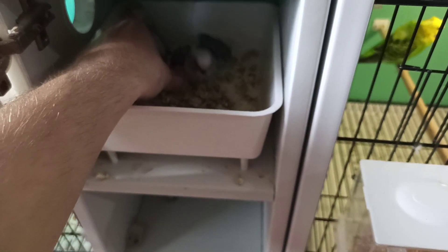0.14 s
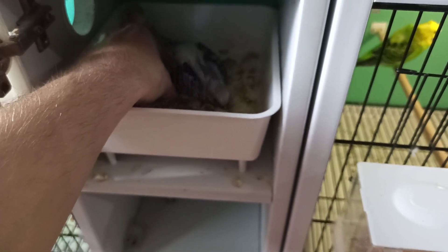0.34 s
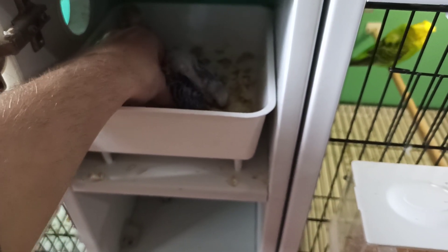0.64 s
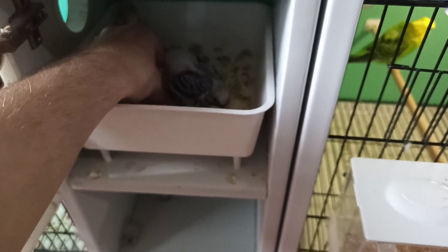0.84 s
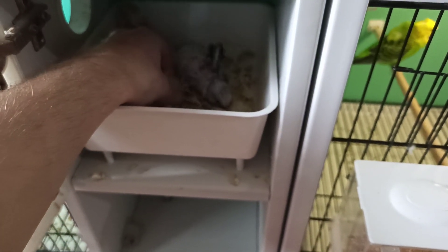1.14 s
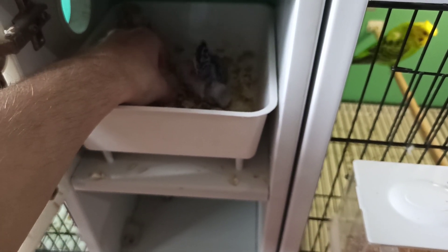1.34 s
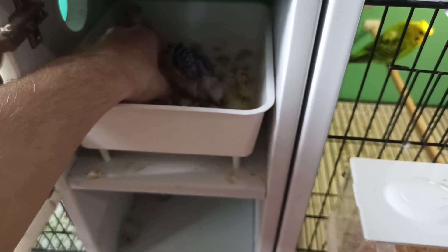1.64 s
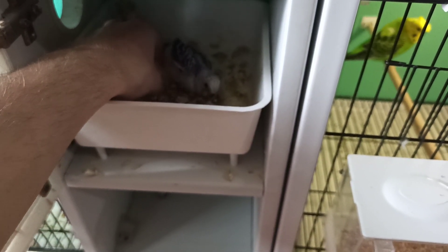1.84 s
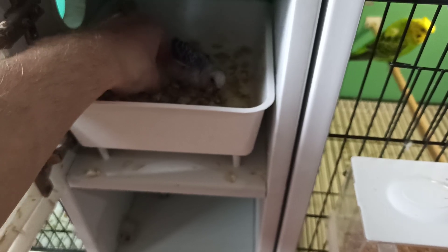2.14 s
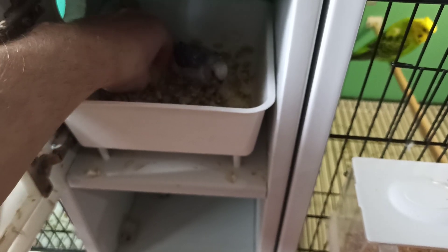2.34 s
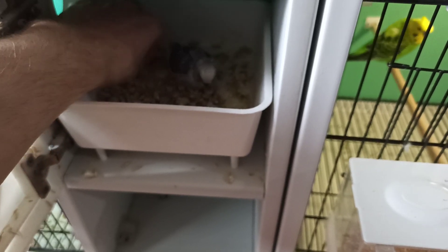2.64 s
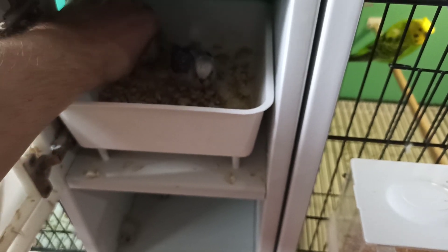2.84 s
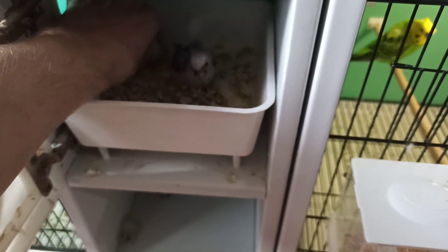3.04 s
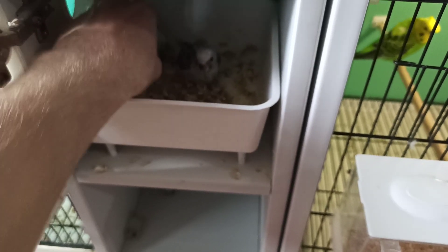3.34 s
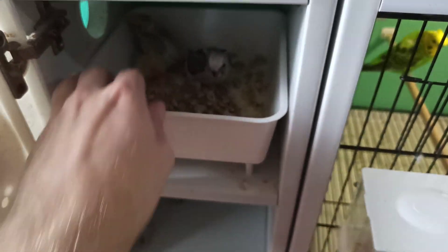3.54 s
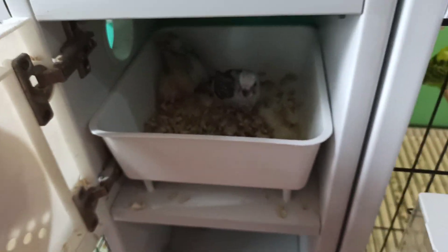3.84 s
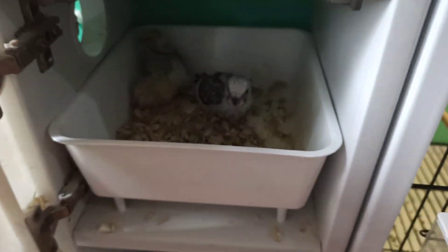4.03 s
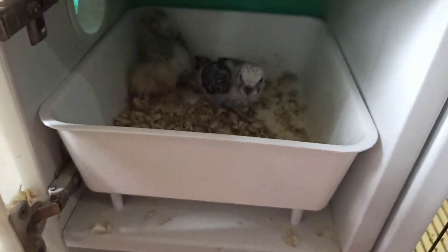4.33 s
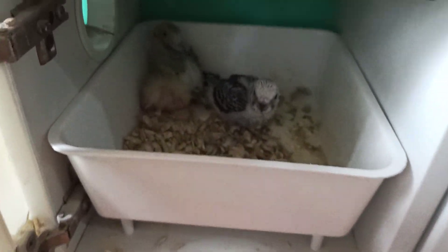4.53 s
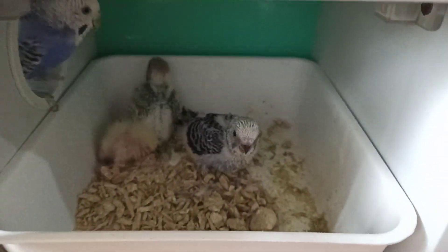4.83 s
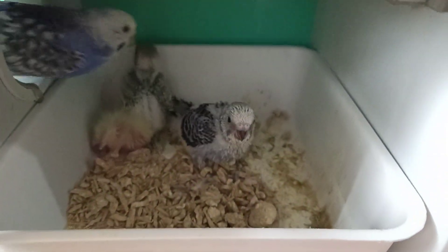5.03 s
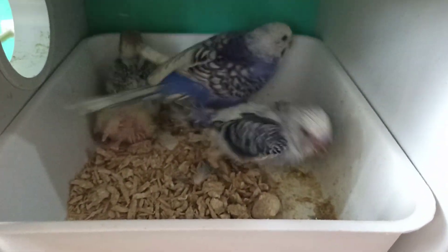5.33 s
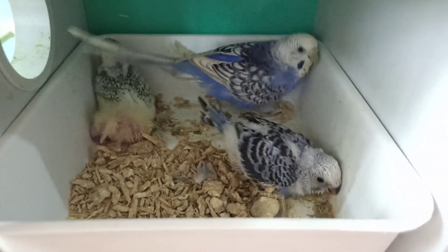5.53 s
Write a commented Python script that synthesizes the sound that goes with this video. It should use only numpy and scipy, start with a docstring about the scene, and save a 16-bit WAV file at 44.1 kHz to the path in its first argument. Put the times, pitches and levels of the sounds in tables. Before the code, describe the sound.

Budgerigar chicks peep and rustle in wood shavings while adult birds squawk and scold, until one lands in their plastic tub with soft thumps.

```python
"""Budgerigar chicks peep in a plastic nest tub while a hand shifts one of them on wood shavings.
About a second in, grown parrots whistle and squawk farther off in a hard-walled bird room; thin chips
come throughout. Each voice is a vibrating membrane, the syrinx, that rasps when it flutters unevenly.
After two seconds and again after four, a faint low tone comes and goes and parrots scold in puffs of air.
Near the end a parent drops into the tub with a few thumps. The room's air rushes softly under it all."""
import sys
import numpy as np
from scipy import signal
from scipy.fft import rfft, irfft, next_fast_len
from scipy.io import wavfile
from scipy.ndimage import uniform_filter1d

SR = 44100
rng = np.random.default_rng(int(sys.argv[2]) if len(sys.argv) > 2 else 0)


def wrap_up_sound(samples):
    """Save the sound to the file named by the first command line argument, as 16-bit audio."""
    columns = np.atleast_2d(samples).T
    # keep every value between -1 and 1, then stretch to whole-number steps
    tamed = np.clip(columns, -1, 1)
    steps = np.round(tamed * 32767).astype(np.int16)
    wavfile.write(sys.argv[1], SR, steps)


N = 250440
T = np.arange(N) / SR

# Runs of peeps, timed at their upward flicks. Each row: first and last flick in seconds,
# low and top pitch in Hz, first and last level in dB.
PEEP_TRAINS = [(.002, 0.063, 3294, 5026, -41.5, -37), (0.311, 0.43, 3265, 4554, -45.5, -40.5),
               (.578, .578, 3247, 4100, -38, -37), (.765, .883, 3255, 4600, -40, -39),
               (1.707, 1.818, 3274, 4905, -39, -42.5), (2.036, 2.156, 3223, 4710, -39, -38),
               (2.978, 3.03, 3140, 5140, -49, -43), (3.256, 3.379, 3295, 4813, -42.5, -40),
               (3.753, 3.82, 3160, 4750, -50, -42), (4.179, 4.228, 3240, 4823, -45.5, -43.5),
               (4.898, 5.073, 3075, 4240, -42.5, -41.5), (2.233, 2.316, 2276, 3714, -49, -56),
               (2.9, 2.957, 2410, 3900, -58.5, -52), (4.146, 4.352, 2332, 3800, -46.5, -52),
               (4.996, 5.069, 2287, 3400, -50, -50.5), (5.595, 5.656, 2974, 3996, -52, -48)]
# One peep. Each row: seconds from the flick, share of the way from low to top pitch, gain in dB.
PEEP_SHAPE = [(-.055, .08, -10), (-.047, 0, 5), (-.032, .1, 4), (-.013, .28, 5.5), (-.005, .45, 1),
              (-.001, .9, 11), (.003, .92, 11), (.009, .5, 5), (.014, .02, 4), (.024, -.15, -12)]
# How a chick's throat shapes its voice. Each row: frequency in Hz, gain in dB.
CHICK_THROAT = [(2200, 4), (3500, 2.5), (4500, -4), (5300, -1.5), (6300, -14), (7400, 2.5), (8500, -17),
                (11000, -40.5), (15000, -26)]
# How much of the overtones the chicks' beaks let out. Each row: time in seconds, gain in dB.
BEAK_OPENING = [(0, -1.5), (3.8, -2), (4.1, -18), (5.68, -10.5)]
# Long, arching parrot calls. Each row: start, lift, crest and end in seconds, low and crest pitch in Hz,
# start and crest level in dB, roughness from 0 to 1, strength of the octave at the low pitch in dB.
WHINES = [(0.561, 0.579, .6, .68, 1900, 2750, -37, -27, 0.5, 9.5),
          (0.984, 1.02, 1.065, 1.1, 1695, 1803, -15.5, -18, 0.3, 24.5),
          (1.05, 1.061, 1.14, 1.225, 1885, 2501, -27, -23, 0.32, -13),
          (2.27, 2.281, 2.33, 2.37, 1480, 1723, -53, -48, 0.15, 1),
          (3.31, 3.371, 3.405, 3.425, 2000, 2400, -45, -34, .6, -2),
          (3.53, 3.61, 3.688, 3.828, 1667, 2420, -32, -20, 0.15, 4)]
# Squawks. Each row: time the voice cracks in seconds, length of the held note in seconds, level in dB.
SQUAWKS = [(.80, .05, -15), (1.21, .08, -15)]
# One falling cry: start and end in seconds, start and end pitch in Hz, start and end level in dB,
# roughness from 0 to 1.
SWOOP = (2.34, 2.478, 3800, 2770, -38, -20, .3)
# How a grown parrot's throat shapes its upper overtones. Each row: frequency in Hz, gain in dB.
PARROT_THROAT = [(4500, -23), (6200, -32), (7400, -25), (8200, -28.5), (10000, -66), (13500, -31),
                 (16000, -32)]
# The swirling air in a screech. Each row: frequency in Hz, gain in dB.
SCREECH_AIR = [(1100, -44), (1900, 1), (3000, 11), (4400, 5.5), (5700, -15), (7400, 1), (13000, -11.5),
               (16000, -28)]
# Harsh scolding notes. Each row: loudest moment, rise and fall in seconds, relative level in dB,
# added brightness in dB per octave.
SCOLDS = [(2.545, .026, .028, -19, -2.5), (2.668, .016, .028, -20, 1), (4.465, .018, .025, -18.5, .3),
          (4.592, .024, .022, -17.5, .5), (4.741, .014, .014, -22.5, -.7), (5.306, .018, .02, -21, 0),
          (5.428, .027, .022, -19.5, .5)]
# The wide throat of a scolding bird. Each row: frequency in Hz, gain in dB.
SCOLD_THROAT = [(700, -33), (1300, -24), (2100, -14), (2700, -6), (3600, 1.5), (5000, -5), (6600, -3.5),
                (7800, -5.5), (12000, -13), (15500, -14)]
# Quick whistled slides. Each row: start and length in seconds, starting pitch in Hz, level in dB.
CHIPS = [(.527, .019, 7100, -47), (1.812, 0.023, 7130, -47), (3.153, 0.0095, 5180, -43.5),
         (3.526, 0.014, 5160, -29), (3.934, .015, 7100, -36.5), (3.974, 0.027, 6720, -41.5),
         (4.82, 0.022, 7260, -35), (5.234, 0.018, 7050, -41), (5.625, 0.019, 7100, -33.5)]
# Short pips on one note. Each row: start and length in seconds, pitch in Hz, level in dB.
PIPS = [(3.952, 0.011, 6430, -45.5), (4.421, 0.013, 6560, -38), (5.210, 0.0095, 6460, -32.5)]
# Blows on the tub. Each row: time in seconds, relative peak in dB, boost of the rim's ring in dB.
KNOCKS = [(.2, -35.5, -2), (.659, -31.5, -16), (2.649, -40.5, 13), (3.252, -39, -30), (3.484, -36, 9),
          (3.643, -35.5, 12), (4.137, -41, -1), (4.874, -38, 3), (5.293, -24.5, 12.5), (5.441, -23.5, -7),
          (5.558, -28.5, 25)]
# The parent's first footfall, laid out like one knock.
LANDING = (5.211, -20.5, -6)
# The tub's ringing notes. Each row: pitch in Hz, level in dB, seconds to fade by 60 dB.
TUB_RING = [(144.6, -13.5, 0.18), (266.7, 2, 0.087), (311.5, 6.5, 0.057), (361.5, -4, 0.069),
            (489, -4.5, 0.04), (643, 0, 0.03), (780, 4.5, 0.017), (890, 0, 0.029), (1140, 1.5, 0.027),
            (1342, -8, 0.047), (2020, -15, 0.06)]
# Spells of stirring in the bedding. Each row: start and end in seconds, level in dB.
RUSTLES = [(0, 0.177, -42), (0.553, 1.643, -42), (2.018, 2.873, -42), (3.36, 3.75, -42.5),
           (4.165, 4.284, -41), (4.6, 4.95, -44.5), (5.15, 5.68, -37)]
# The sharpest snaps of shavings and claws. Each row: time in seconds, relative peak in dB.
SNAPS = [(.5227, -39), (1.9264, -48), (2.393, -36), (2.8523, -42), (3.16, -43.5), (4.1742, -38),
         (4.2253, -34), (4.2752, -33.5), (4.8739, -32), (5.145, -35), (5.1929, -35.5)]
# The tone colour of wood shavings. Each row: frequency in Hz, gain in dB.
SHAVINGS = [(200, -2.5), (600, 1), (1100, -7.5), (1700, -0.5), (3500, 0), (4600, -2), (5500, -15.5),
            (7300, -5.5), (12000, -15.5), (16000, -3)]
# The faint low tone. Each row: start and length in seconds, level in dB.
LOW_TONES = [(2.18, .1, -46), (2.32, .12, -46), (2.49, .1, -47), (4.17, .1, -50), (4.48, .1, -50),
             (4.61, .11, -49)]
# The tone colour of the room's rushing air. Each row: frequency in Hz, gain in dB.
AIR_COLOUR = [(25, -44.5), (45, -57), (70, -8.5), (97, 6), (190, -1), (300, 4), (500, -3.5), (700, -12),
              (950, -6), (1500, -22.5), (4000, -26)]
# How that rush swells and sinks. Each row: time in seconds, relative level in dB.
AIR_LEVEL = [(0, -52), (2.1, -54), (2.7, -49.5), (3.0, -50), (3.9, -52), (4.4, -50), (5.68, -50)]
# How alike the rush is in both ears. Each row: frequency in Hz, likeness from 0 to 1.
EAR_LIKENESS = [(60, 0.96), (300, 0.91), (600, 0.88), (1200, 0.091), (3000, 0)]
# The room's echo. Each row: frequency in Hz, seconds to fade by 60 dB.
ROOM_ECHO = [(200, .4), (1000, .5), (2200, .55), (3200, .62), (7000, .58), (14000, .4)]
# The microphone's uneven treble. Each row: frequency in Hz, gain in dB.
MICROPHONE = [(4400, -1), (5400, -1), (6500, 8.5), (7700, 3), (8500, -3.5), (9300, -81.5), (10800, -62),
              (11800, -1), (16000, -10)]


def chicks(shimmer_db=2, beak_db=3, jitter=.02, buzz=.4, buzz_hz=750, stretch=.1):
    """A chick's syrinx makes each peep: the pitch sags, creeps up, flicks high and drops."""
    out = np.zeros(N)
    when, share, swell_db = np.transpose(PEEP_SHAPE)
    t = np.arange(when[0], when[-1], 1 / SR)
    for s, low_hz, top_hz, db in peeps():
        pace = 1 + stretch * rng.uniform(-1.065, 1)
        glide = uniform_filter1d(np.interp(t * pace, when, share), size=220)
        hz = (low_hz + (top_hz - low_hz) * glide) * (1 + jitter * wander(len(t), 600))
        level = amp(db + np.interp(t, when, swell_db) + shimmer_db * wander(len(t), 120))
        # the moving beak lets more or less of the overtones out
        opening_db = np.interp(s, *np.transpose(BEAK_OPENING)) + beak_db * np.tanh(wander(len(t), 23))
        voice = syrinx(hz, [read(CHICK_THROAT, k * hz) + (k > 1) * opening_db for k in range(1, 5)])
        # the other side of the syrinx beats against the first and roughens some peeps
        voice *= 1 + buzz * rng.random() * syrinx(buzz_hz * (1 + 0.148 * wander(len(t), 100)), [0])
        add(out, s + t[0], level * voice * signal.windows.tukey(len(t), .1))
    return out


def peeps(cycles_apart=185, last_flick=0.76, flick_spread=.08):
    """Spaces peeps evenly in each run; deeper chicks peep more slowly, and a run ends on a lower flick."""
    for first, last, low_hz, top_hz, first_db, last_db in PEEP_TRAINS:
        count = round((last - first) * low_hz / cycles_apart) + 1
        for progress in np.linspace(0, 1, count):
            flick = (last_flick if progress == 1 else 1) * (1 + flick_spread * rng.uniform(-0.97, 1))
            flick_hz = low_hz + (top_hz - low_hz) * flick
            db = first_db + progress * (last_db - first_db)
            yield first + progress * (last - first), low_hz, flick_hz, db


def parrots(rasp=0.1344, rasp_hz=700, flutter_db=7, flutter_hz=380, air=0.77):
    """Whistled calls that break into a screech when the membrane flutters wildly."""
    out = np.zeros(N)
    calls = [whine(*row) for row in WHINES] + [squawk(*row) for row in SQUAWKS] + [swoop(*SWOOP)]
    for s, hz, db, rough, octave_db in calls:
        size = len(hz)
        hz = hz * np.exp(rasp * rough * wander(size, rasp_hz))
        total_db = 10 * np.log10(1 + amp(octave_db) ** 2)  # the note and its octave share the power
        overtones_db = [read(PARROT_THROAT, k * hz) for k in range(3, 10)]
        tone = syrinx(hz, [-total_db, octave_db - total_db] + overtones_db)
        noisy = np.clip(air * (rough - .15), 0, 1)  # past this roughness the air starts to swirl
        screech = evened(colour(rng.standard_normal(size), SCREECH_AIR))
        voice = np.sqrt(1 - noisy) * tone + np.sqrt(noisy) * screech
        level = amp(db + flutter_db * rough * np.tanh(wander(size, flutter_hz)))
        add(out, s, voice * level * signal.windows.tukey(size, .12))
    return out


def whine(start, lift, crest, end, low_hz, crest_hz, start_db, crest_db, rough, octave_db):
    """The bird's effort lifts pitch and level together; past the crest the pitch sinks ever faster."""
    t = np.arange(start, end, 1 / SR)
    effort = np.interp(t, [lift, crest], [0, 1])
    sag = 21 * np.maximum(t - crest, 0) ** 2
    octaves = effort * np.log2(crest_hz / low_hz) - sag
    octaves = uniform_filter1d(octaves, int(0.0345 * SR), mode="nearest")  # rounds the corners
    db = start_db + (crest_db - start_db) * np.sqrt(effort)
    # the octave fades as the rising pitch carries it out of the range where the throat rings
    return start, low_hz * 2 ** octaves, db, rough, octave_db - 39.5 * octaves


def squawk(s, hold, db, whistle_hz=2688, held_hz=1542, whistle_s=.036, crack_s=.042):
    """A whistle cracks into a screech as it drops, then lands on a held nasal note."""
    t = np.arange(-whistle_s, crack_s + hold, 1 / SR)
    drop = np.clip(t / crack_s, 0, 1)
    crack = np.exp(-((t - crack_s / 2) / 0.02075) ** 2)
    hz = whistle_hz + (held_hz - whistle_hz) * drop
    fade_in_db = -11 * np.maximum(-t / whistle_s, 0)
    level_db = db - 4 * (1 - drop) - 4 * crack + fade_in_db  # the held note is the loudest part
    rough = .1 + 1.1 * crack
    octave_db = np.interp(drop, [0, 1], [-14, 32])  # the octave takes over
    return s + t[0], hz, level_db, rough, octave_db


def swoop(start, end, start_hz, end_hz, start_db, end_db, rough, octave_db=-28, tip_s=2.415, fall_s=.016):
    """A raspy cry that tips over, swells as it falls and levels out."""
    t = np.arange(start, end, 1 / SR)
    fall = 1 / (1 + np.exp((tip_s - t) / fall_s))
    hz = start_hz + (end_hz - start_hz) * fall
    return start, hz, start_db + (end_db - start_db) * fall, rough, octave_db


def scolds(pulse_hz=420, unevenness=.3, pulse_decay=0.64, grit_db=-1.5, boost_db=2.0):
    """Uneven puffs of air through a wide throat, swelling and dying in about a tenth of a second."""
    out, t = np.zeros((2, N)), np.arange(-SR // 10, SR // 10) / SR
    for s, rise, fall, db, tilt_db in SCOLDS:
        cycles = np.cumsum(pulse_hz * (1 + unevenness * wander(len(t), 200))) / SR
        puffs = np.exp(-(cycles % 1) / pulse_decay) * rng.standard_normal(len(t))
        puffs *= amp(grit_db * np.tanh(wander(len(t), 300)))
        swell = np.exp(-.5 * (t / np.where(t < 0, rise, fall)) ** 2)
        note = amp(db + boost_db) * swell * evened(colour(puffs, SCOLD_THROAT, tilt_db))
        # the bird moves between notes, so each has its own echoes
        placed = place(note, right_db=4.0, lag_ms=0.19, tub_db=9, room_db=1.5, tub_fade_s=0.035)
        for ear, sound in zip(out, placed):
            add(ear, s + t[0], sound)
    return out


def chips(fall_octaves_per_s=42, octave_db=-24, jitter=0.015):
    """Thin, nearly pure whistles: chips slide down, pips stay level."""
    out = np.zeros(N)
    for rows, fall in (CHIPS, fall_octaves_per_s), (PIPS, 0):
        for s, length, start_hz, db in rows:
            t = np.arange(0, length, 1 / SR)
            hz = start_hz * 2 ** (-fall * t) * (1 + jitter * wander(len(t), 900))
            add(out, s, amp(db) * syrinx(hz, [0, octave_db]) * signal.windows.tukey(len(t), .5))
    return out


def knocks(rim_above_hz=700, contact_s=0.0023, boost_db=6.0):
    """Knuckles and feet strike the tub: its floor thuds, its walls and rim clack."""
    out, t = np.zeros(N), np.arange(SR // 6) / SR
    for s, peak_db, rim_db in KNOCKS + footfalls():
        blow = np.zeros(len(t))
        for hz, db, fade_s in TUB_RING:
            level = amp(db + rim_db * (hz > rim_above_hz) - 60 * t / fade_s)
            ring_hz = hz * (1 + 0.046 * rng.standard_normal())
            blow += level * np.sin(2 * np.pi * (ring_hz * t + rng.random()))
        blow *= 1 - np.exp(-t / contact_s)
        add(out, s, amp(peak_db + boost_db) * blow / abs(blow).max())
    return out


def footfalls(count=4, gap_s=.02, loss_db=3.5):
    """The parent lands in a quick run of ever softer knocks."""
    s, db, rim_db = LANDING
    return [(s + k * gap_s, db - k * loss_db, rim_db) for k in range(count)]


def bedding(clicks_per_s=5000, spread_db=3, clump_db=3, snap_boost_db=13, snap_decay_s=0.0027):
    """Shavings rub and crack: clumps of tiny clicks with single larger snaps."""
    sizes = amp(spread_db * np.minimum(rng.exponential(1, N), 4) + clump_db * wander(N, 32))
    clicks = sizes * rng.choice([-1, 1], N) * (rng.random(N) < clicks_per_s / SR)
    out = evened(colour(clicks, SHAVINGS)) * stirring()
    t = np.arange(SR // 20) / SR
    for s, db in SNAPS:
        snap = colour(rng.standard_normal(len(t)) * np.exp(-t / snap_decay_s), SHAVINGS)
        add(out, s, amp(db + snap_boost_db) * snap / abs(snap).max())
    return out


def stirring(settled_db=-49.5, rise_s=.04, settle_s=0.087):
    """How hard the bedding moves: each spell rises, holds and settles."""
    spells = [amp(db) * np.exp(-np.maximum(start - T, 0) / rise_s - np.maximum(T - end, 0) / settle_s)
              for start, end, db in RUSTLES]
    return np.maximum(np.max(spells, axis=0), amp(settled_db))


def low_tones(pitch_hz=505, waver=0.015, flicker_db=2):
    """A soft, broken, wavering tone far behind the birds."""
    out = np.zeros(N)
    for s, length, db in LOW_TONES:
        size = int(length * SR)
        tone = syrinx(pitch_hz * (1 + waver * wander(size, 56)), [0])
        tone *= amp(flicker_db * wander(size, 29))
        add(out, s, amp(db) * evened(tone) * signal.windows.hann(size))
    return out


def room_air(boost_db=2, left_db=1.0, hiss_db=-69):
    """A low rush of air, alike in both ears in the bass, with a faint hiss on top."""
    left, other = rfft(rng.standard_normal((2, N)))
    hz = np.fft.rfftfreq(N, 1 / SR)
    likeness = read(EAR_LIKENESS, hz)
    right = likeness * left + np.sqrt(1 - likeness ** 2) * other
    rush = evened(irfft(np.array([left, right]) * amp(read(AIR_COLOUR, hz)), N))
    rush *= amp(boost_db + np.interp(T, *np.transpose(AIR_LEVEL))) * amp([[left_db / 2], [-left_db / 2]])
    hiss = evened(colour(rng.standard_normal((2, N)), [(1000, 16), (4000, 2.0), (15000, -64)]))
    return rush + amp(hiss_db) * hiss


def syrinx(hz, levels_db):
    """A tone like a vibrating membrane's: waves at 1, 2, 3.. times one pitch."""
    phase = 2 * np.pi * np.cumsum(hz) / SR
    return evened(sum(amp(db) * np.sin(k * phase) * (k * hz < SR / 2)
                      for k, db in enumerate(levels_db, 1)))


def echoes(fade_times, onset_s):
    """Dense echoes for each ear, every frequency dying away at its own speed."""
    hz, t, bands = signal.stft(rng.standard_normal((2, 2 * SR // 3)), SR, nperseg=256)
    tail = signal.istft(bands * amp(-60 * t / read(fade_times, hz)[:, None]), SR, nperseg=256)[1]
    tail *= 1 - np.exp(-np.arange(tail.shape[1]) / SR / onset_s)
    return tail / np.linalg.norm(tail, axis=1, keepdims=True)


def place(x, right_db, lag_ms, tub_db, room_db, tub_fade_s=0.014):
    """Sound reaches the ears directly, as quick echoes off the tub, and by way of the room."""
    path = amp(room_db) * echoes(ROOM_ECHO, 0.0086) + amp(tub_db) * echoes([(1, tub_fade_s)], 0.0015)
    path[0, 0] += 1
    path[1, int(lag_ms * SR / 1000)] += 1  # the direct sound reaches the right ear later
    path /= np.linalg.norm(path, axis=1, keepdims=True)
    return signal.fftconvolve(x[None], path, axes=1)[:, :N] * amp([[-right_db / 2], [right_db / 2]])


def amp(db):
    """Turns decibels into a multiplier."""
    return 10 ** (np.asarray(db) / 20)


def evened(x):
    """Scales a signal to an average power of 1."""
    return x / np.sqrt(np.mean(x ** 2) + 1e-20)


def read(points, hz):
    """Looks up a frequency in a table, blending between rows on a scale of octaves."""
    row_hz, value = np.transpose(points)
    return np.interp(np.log(hz + 1), np.log(row_hz + 1), value)


def add(mix, s, sound):
    """Mixes a sound in at s seconds."""
    start = round(s * SR)
    part = mix[max(start, 0):][:max(len(sound) + min(start, 0), 0)]
    part += sound[max(-start, 0):][:len(part)]


def colour(x, points, tilt_db=0):
    """Turns frequencies up or down by a table, plus a tilt in dB per octave."""
    size = next_fast_len(2 * x.shape[-1])
    hz = np.fft.rfftfreq(size, 1 / SR)
    gain = amp(read(points, hz) + tilt_db * np.log2(hz / SR + 0.0013))
    return irfft(rfft(x, size) * gain, size)[..., :x.shape[-1]]


def wander(size, rate_hz):
    """A smooth random wobble, changing up to about rate_hz times a second."""
    hz = np.fft.rfftfreq(size, 1 / SR)
    return evened(irfft(rfft(rng.standard_normal(size)) * np.exp(-(hz / rate_hz) ** 2), size))


def scene():
    """Near sounds come from the tub; the grown birds' loud calls carry the most room echo."""
    return (place(chicks(), right_db=3.5, lag_ms=.23, tub_db=-6, room_db=-11.5, tub_fade_s=0.065)
            + place(parrots(), right_db=3.5, lag_ms=0.23, tub_db=6, room_db=0, tub_fade_s=0.079)
            + place(chips(), right_db=-4, lag_ms=.2, tub_db=1.5, room_db=-19)
            + scolds()
            + place(knocks(), right_db=-2.5, lag_ms=.05, tub_db=-2, room_db=-10.5)
            + place(bedding(), right_db=1.5, lag_ms=0.15, tub_db=9, room_db=-12.5)
            + place(low_tones(), right_db=-1, lag_ms=.1, tub_db=-12, room_db=-6)
            + room_air())


def record(dry, lowest_hz=55, highest_hz=15850):
    """The microphone colours the treble, thins the deep bass, softens peaks and cuts the very top."""
    bass_cut = signal.butter(3, lowest_hz, "highpass", fs=SR, output="sos")
    heard = signal.sosfilt(bass_cut, colour(dry, MICROPHONE))
    heard = .9 * np.tanh(heard / .9)
    top_cut = signal.firwin(511, highest_hz, window=("kaiser", 9), fs=SR)
    return signal.oaconvolve(heard, top_cut[None], "same")


dry = scene()
out = record(dry)
wrap_up_sound(out)
```